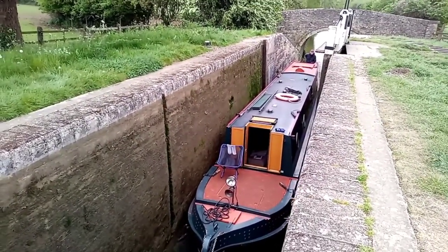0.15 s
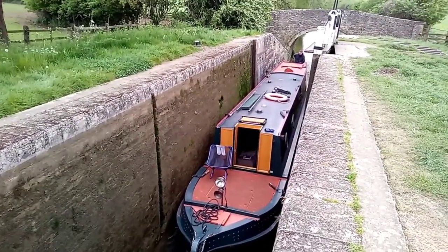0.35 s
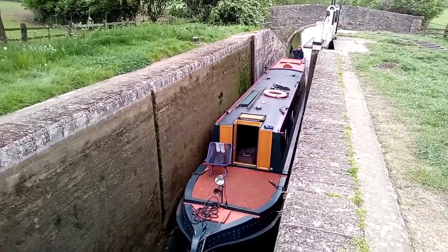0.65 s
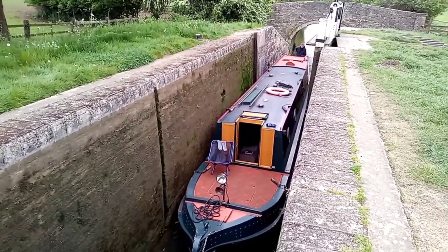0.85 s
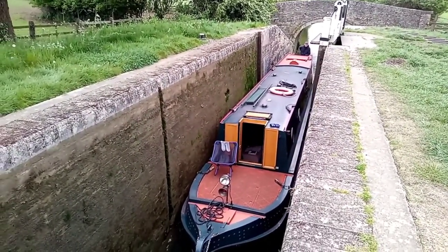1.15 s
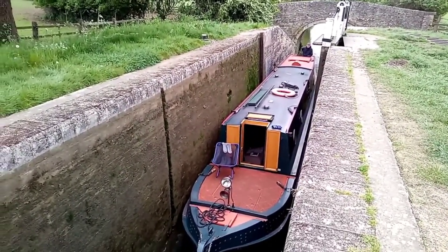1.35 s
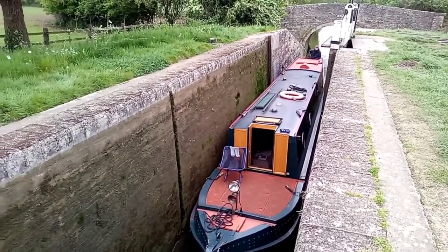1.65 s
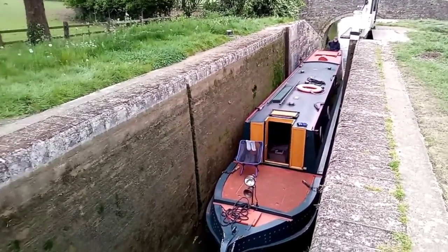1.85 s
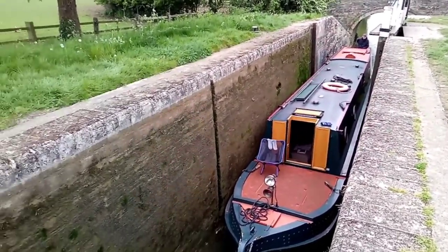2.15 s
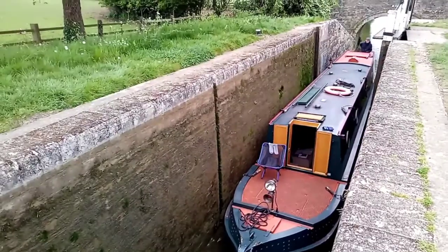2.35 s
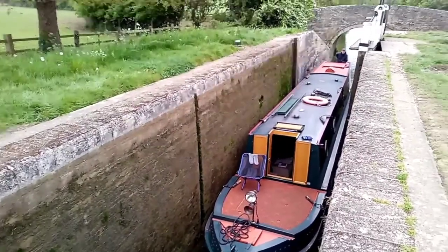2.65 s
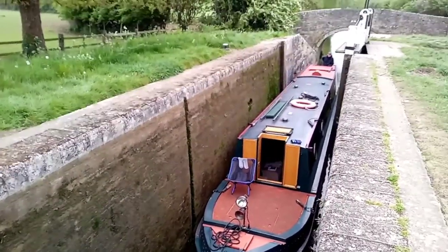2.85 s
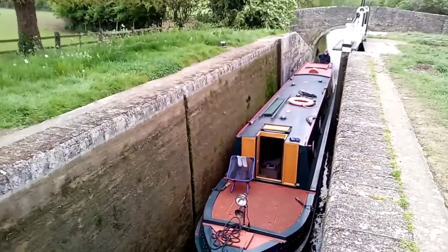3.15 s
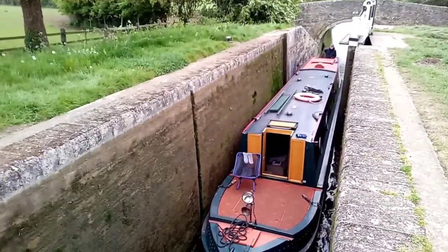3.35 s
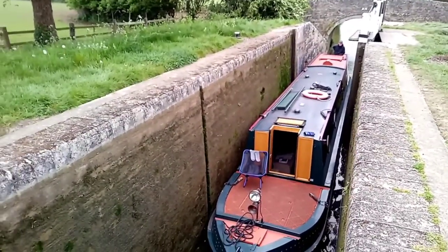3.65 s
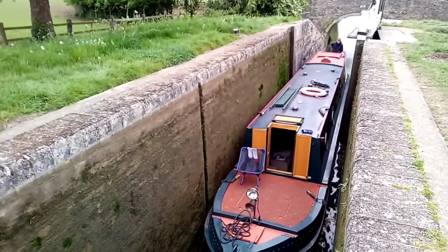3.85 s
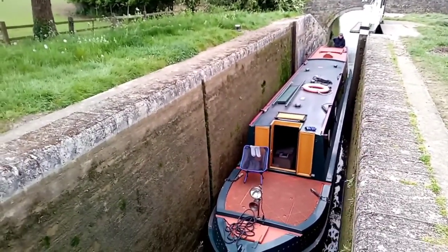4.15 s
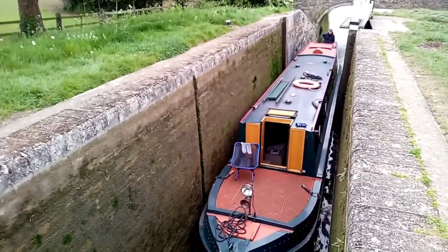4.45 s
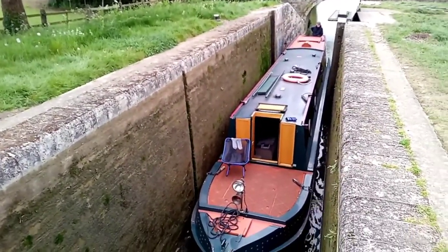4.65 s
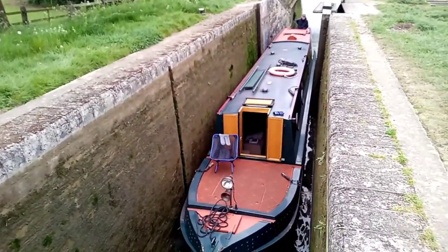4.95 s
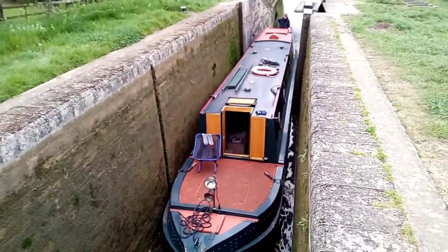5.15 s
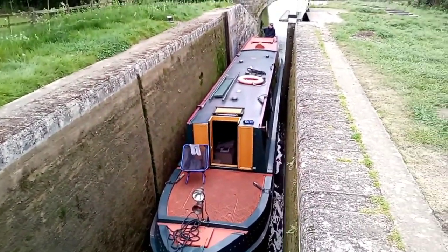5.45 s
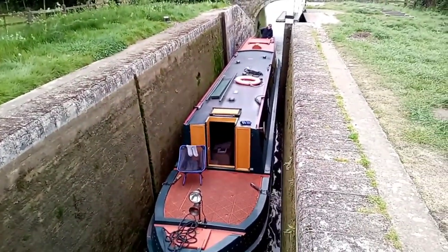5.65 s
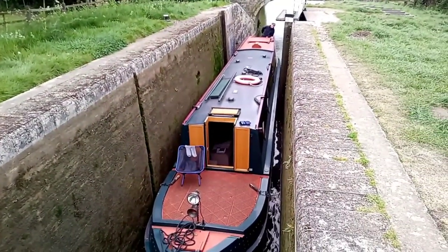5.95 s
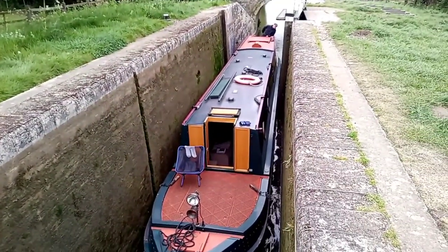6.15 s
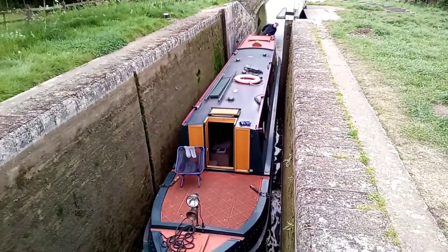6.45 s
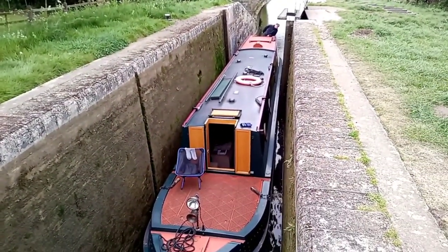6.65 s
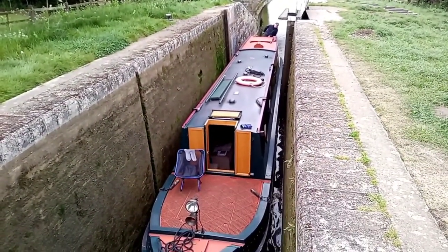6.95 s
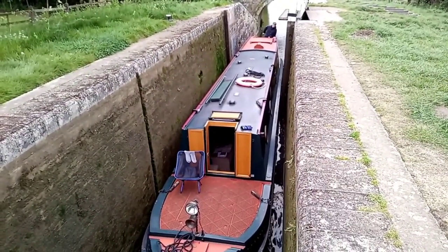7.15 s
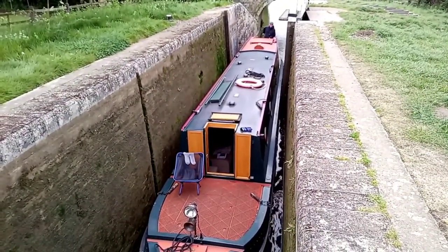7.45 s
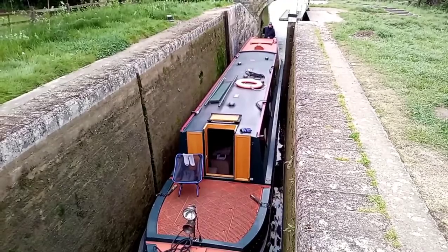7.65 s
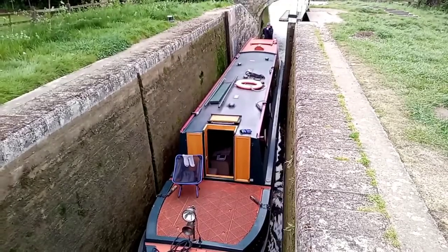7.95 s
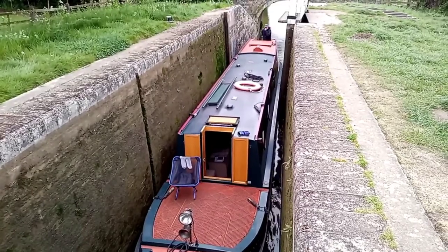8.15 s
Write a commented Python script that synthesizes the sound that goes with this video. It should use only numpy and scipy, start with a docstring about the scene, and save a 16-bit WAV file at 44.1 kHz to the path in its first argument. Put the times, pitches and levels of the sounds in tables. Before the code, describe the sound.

A steady roar of churning water is heard from the side of a canal lock, outdoors, on a small mono microphone. Spray and bursting bubbles gradually swell and then level off, with gurgling blurred by the stone walls. Beneath the water a boat's diesel engine hums at idle throughout, while irregular gusts add low rumbles and a few soft thumps.

```python
"""A roar of water, rushing through open sluices into a deep stone canal lock, heard from the lock side.
The jets churn the pool; their spray and bursting bubbles grow louder and brighter, then hold.
Air pockets gurgle up, and the walls scatter the ring of the bubbles.
A narrowboat's four-cylinder diesel idles in the chamber; gusts buffet a small mono microphone."""
import sys
import numpy as np
from scipy import signal
from scipy.fft import rfft, irfft
from scipy.io import wavfile
from scipy.ndimage import uniform_filter1d

SR = 44100
rng = np.random.default_rng(int(sys.argv[2]) if len(sys.argv) > 2 else 0)


def wrap_up_sound(samples):
    """Save the sound to the file named by the first command line argument, as 16-bit audio."""
    columns = np.atleast_2d(samples).T
    # keep every value between -1 and 1, then stretch to whole-number steps
    tamed = np.clip(columns, -1, 1)
    steps = np.round(tamed * 32767).astype(np.int16)
    wavfile.write(sys.argv[1], SR, steps)


N = 366471
TIME_S = np.arange(N) / SR
BINS_HZ = np.fft.rfftfreq(N, 1 / SR)

# Churning water between the walls: freq_hz, gain_db
ROAR_SPECTRUM = [(25, -22), (60, -10), (110, 5.5), (220, 4.5), (330, 0.5), (470, -2), (660, 0), (950, -1),
                 (1350, -2.5), (2200, -4.5), (3100, -11), (5000, -22), (9000, -18), (16000, -26)]
# Spray and foam where the jets break: freq_hz, gain_db
SPRAY_SPECTRUM = [(400, -22), (1300, -11), (1800, -6.5), (2350, -3.5), (3050, -6.5), (3400, -5.5),
                  (4000, -1.5), (4500, -0.5), (5200, -2.5), (5800, -1), (6300, 1), (6700, 0), (16000, 0.5)]
# Surges in the inflow: start_s, strength_db
FLOW_SURGES = [(1.8, 2), (4.25, 1.1)]
# Exhaust and hull tones, firing harmonics at multiples of 4: cycle_multiple, relative_db
ENGINE_TONES = [(8, -52), (12, -42), (16, -47.5), (20, -56.5), (24, -56), (27, -54.5), (28, -52.5),
                (31, -64), (32, -58), (35, -54), (37, -54.5), (44, -64), (49, -68)]
# Wind rumble: freq_hz, gain_db
WIND_SPECTRUM = [(20, -30), (35, -19), (55, -6), (80, 0), (120, -2.5), (180, -3.5), (260, -10.5),
                 (400, -17.5), (800, -48), (2000, -70)]
# Gusts over the breeze: crest_s, half_width_s, level_db
WIND_GUSTS = [(1.41, .11, -33.5), (1.72, 0.057, -35), (2.123, 0.053, -33.5), (2.677, 0.35, -32.3),
              (3.378, 0.055, -30.5), (3.72, .04, -33), (4.07, 0.042, -35.5), (4.35, .12, -38.5),
              (4.72, 0.11, -39), (5.57, .05, -33.5), (5.787, 0.14, -35.5), (6.576, 0.076, -30),
              (6.71, .05, -39), (7.858, 0.1, -32), (8.08, 0.037, -37)]
# Single eddies hitting the microphone: peak_s, relative_db, pitch_hz
EDDIES = [(1.406, -22, 100), (1.433, -19, 90.5), (1.712, -19.5, 134), (2.595, -20, 100),
          (2.647, -15.5, 162), (2.659, -14.5, 94), (2.754, -19.5, 135), (2.835, -24.5, 220),
          (3.364, -15, 184), (3.396, -16, 101), (4.301, -23.5, 119), (6.05, -24, 100), (6.718, -20, 115)]
# Microphone, dull above 7 kHz with a small peak at the top: freq_hz, gain_db
MIC_RESPONSE = [(10, -20), (45, -0.5), (6650, -2), (7000, -10.5), (7500, -17), (8000, -25.5), (9200, -30.5),
                (11000, -33), (12500, -37.5), (13800, -38), (14300, -28), (14750, -22), (15700, -22.5)]


def roar():
    """Jets churn the pool: a low rush with bubbles in it."""
    froth = bubbles(350, 2215, per_s=500, decay_cycles=4.14, spread_db=2, ring_samples=1500)
    froth = chamber(froth, t60_s=0.29, wet_db=-4.5)
    rush = splashing(patch_db=1, patch_bins=4, patch_frames=16)
    water = coloured(rush + gain_of(-11.5) * froth, ROAR_SPECTRUM)
    water /= band_rms(water, 450, 1500)
    level_db = flow_db(full_db=-37.5, rise_db=0.8, surge_share=0.5)
    return water * gain_of(level_db + 0.14 * wander(rate_hz=13))


def spray():
    """Breaking water hisses unevenly, full of tiny bursting bubbles."""
    fizz = bubbles(1680, 7600, per_s=2000, decay_cycles=4.7, spread_db=3, ring_samples=400)
    fizz = chamber(fizz, t60_s=0.21, wet_db=-7)
    hiss = splashing(patch_db=0.78, patch_bins=12, patch_frames=12, airborne=True)
    water = coloured(hiss + gain_of(-9.5) * fizz, SPRAY_SPECTRUM)
    water /= band_rms(water, 3600, 7000)
    level_db = flow_db(full_db=-26.75, rise_db=6, surge_share=0.74)
    return water * gain_of(level_db + 0.57 * wander(rate_hz=21))


def gurgle():
    """Large air pockets well up as the inflow grows, blurred by the chamber."""
    pockets = bubbles(540, 726, per_s=430, decay_cycles=3.7, spread_db=1.5, ring_samples=1500)
    level_db = flow_db(full_db=-43.5, rise_db=14, surge_share=2.5)
    return chamber(pockets, t60_s=0.4, wet_db=-4.5) * gain_of(level_db)


def inflow(time_s, full_s=7.1):
    """Inflow strength, 0 to 1: grows, levels off, holds."""
    return np.sin(np.pi / 2 * np.minimum(time_s / full_s, 1)) ** 1.31


def flow_db(full_db, rise_db, surge_share, crest_after_s=0.33):
    """A water layer's level follows the inflow; each surge crests, then ebbs slowly."""
    level_db = full_db - rise_db * (1 - inflow(TIME_S))
    for start_s, strength_db in FLOW_SURGES:
        age = np.maximum(TIME_S - start_s, 0) / crest_after_s
        level_db += surge_share * strength_db * (age * np.exp(1 - age)) ** 2
    return level_db


def splashing(patch_db, patch_bins, patch_frames, airborne=False):
    """Hiss flares in random patches of time and pitch; airborne spray changes colour with the flow."""
    framing = dict(fs=SR, nperseg=512, noverlap=384)
    freq_hz, time_s, noise = signal.stft(rng.standard_normal(N), **framing)
    patches = uniform_filter1d(rng.standard_normal(noise.shape), patch_bins, axis=0)
    patches = uniform_filter1d(patches, patch_frames, axis=1)
    gain_db = patch_db * unit_rms(patches)
    if airborne:
        gain_db += spray_colour_db(freq_hz[:, None], time_s)
    _, hiss = signal.istft(noise * gain_of(gain_db), **framing)
    return unit_rms(hiss[:N])


def spray_colour_db(freq_hz, time_s):
    """As the flow builds, a dip in the spray's spectrum fills in and the finest hiss recedes."""
    dip_hz, width_hz, fill_s, top_hz = 3290, 410, 0.9, 11000
    dip_db = -1 - 9 * np.exp(-time_s / fill_s)
    top_db = 1.5 - 3.4 * inflow(time_s) ** 2
    return dip_db * bell(freq_hz, dip_hz, width_hz) + top_db * np.minimum(freq_hz / top_hz, 1) ** 6


def bubbles(low_hz, high_hz, per_s, decay_cycles, spread_db, ring_samples):
    """Each bubble rings briefly, its pitch rising as it nears the surface; a few are loud."""
    onset_draw, pitch_draw, level_draw = rng.random((int(per_s * N / SR), 3)).T[:, :, None]
    time_s = np.arange(ring_samples) / SR
    pitch_hz = low_hz * (high_hz / low_hz) ** pitch_draw
    age = time_s * pitch_hz / decay_cycles
    glide = 1 + 0.013 * np.minimum(age, 5)
    rings = np.sin(2 * np.pi * pitch_hz * time_s * glide) * np.exp(-age)
    boost_db = spread_db * np.minimum(-np.log(level_draw + 1e-9), 4)
    rings *= gain_of(boost_db) * np.sqrt(pitch_hz)
    positions = (onset_draw * N).astype(int) + np.arange(ring_samples)
    return unit_rms(np.bincount(positions.ravel(), rings.ravel(), N)[:N])


def chamber(sound, t60_s, wet_db, paths=6, gap_s=0.006):
    """Stone walls scatter each splash; the heaving surface keeps changing the echo paths."""
    delay_s = np.arange(SR // 3) / SR
    wet = np.zeros(N)
    for path in range(paths):
        echoes = rng.standard_normal(len(delay_s)) * gain_of(-60 * delay_s / t60_s) * (delay_s > gap_s)
        share = np.cos(np.pi * (2 * TIME_S + path / paths)) ** 3
        wet += signal.oaconvolve(sound * share, echoes)[:N]
    return unit_rms(sound + gain_of(wet_db) * unit_rms(wet))


def engine(cycle_hz=7.789):
    """Idling diesel: harmonics of the four-stroke cycle, wavering slightly in level."""
    cycles = cycle_hz * TIME_S
    tones = sum(gain_of(relative_db) * np.sin(2 * np.pi * (multiple * cycles + rng.random()))
                for multiple, relative_db in ENGINE_TONES)
    return np.sqrt(2) * tones * gain_of(0.5 + 1.1 * wander(rate_hz=1.9))


def wind(breeze_db=-42, flutter_band_hz=(200, 376)):
    """Lumpy low turbulence: a steady breeze, and gusts that swell, brighten and die away."""
    rumble = unit_rms(coloured(rng.standard_normal(N), WIND_SPECTRUM))
    gust_power = sum((gain_of(level_db) * bell(TIME_S, crest_s, half_width_s)) ** 2
                     for crest_s, half_width_s, level_db in WIND_GUSTS)
    force = np.sqrt(gain_of(breeze_db) ** 2 + gust_power)
    lumps = gain_of(2.2 * wander(rate_hz=21))
    bandpass = signal.butter(2, flutter_band_hz, "bandpass", fs=SR, output="sos")
    flutter = unit_rms(signal.sosfilt(bandpass, rng.standard_normal(N))) * gain_of(-38)
    return lumps * (rumble * force + flutter * (force / force.max()) ** 2)


def buffets(decay_cycles=0.54):
    """Each eddy strikes the diaphragm: a pointed push between two softer pulls."""
    thumps = np.zeros(N)
    for peak_s, relative_db, pitch_hz in EDDIES:
        cycles = (TIME_S - peak_s) * pitch_hz
        near = abs(cycles) < 4
        pulse = np.cos(2 * np.pi * cycles[near]) * np.exp(-abs(cycles[near]) / decay_cycles)
        thumps[near] += gain_of(relative_db + 1.5) * pulse
    return thumps


def gain_of(level_db):
    """Decibels to amplitude."""
    return 10 ** (np.asarray(level_db) / 20)


def unit_rms(sound):
    """Scales to rms 1."""
    return sound / np.sqrt(np.mean(sound ** 2) + 1e-20)


def band_rms(sound, low_hz, high_hz):
    """Rms within a band."""
    in_band = (BINS_HZ > low_hz) & (BINS_HZ < high_hz)
    return np.sqrt(2 * np.sum(abs(rfft(sound)[in_band]) ** 2)) / N


def bell(x, centre, half_width):
    """Gaussian bump, peak 1."""
    return np.exp(-((x - centre) / half_width) ** 2)


def coloured(sound, spectrum):
    """Filters by a spectrum table, interpolated over log frequency."""
    freq_hz, gain_db = np.transpose(spectrum)
    curve_db = np.interp(np.log(BINS_HZ + 1), np.log(freq_hz + 1), gain_db)
    return irfft(rfft(sound) * gain_of(curve_db), N)


def wander(rate_hz):
    """Random motion, rms 1, with little above rate_hz."""
    response = BINS_HZ / (BINS_HZ + 2) / (1 + (BINS_HZ / rate_hz) ** 2)
    return unit_rms(irfft(rfft(rng.standard_normal(N)) * response, N))


def scene():
    """Water, engine and wind, the same in both channels."""
    sound = roar() + gurgle() + spray() + engine() + wind() + buffets()
    return np.array([sound, sound])


def record(dry):
    """Microphone response, then a steep band limit."""
    cutoff_hz = 15750
    heard = np.array([coloured(channel, MIC_RESPONSE) for channel in dry])
    lowpass = signal.firwin(1023, cutoff_hz, window=("kaiser", 9), fs=SR)
    return signal.oaconvolve(heard, lowpass[None], "same")


dry = scene()
out = record(dry)
wrap_up_sound(out)
```